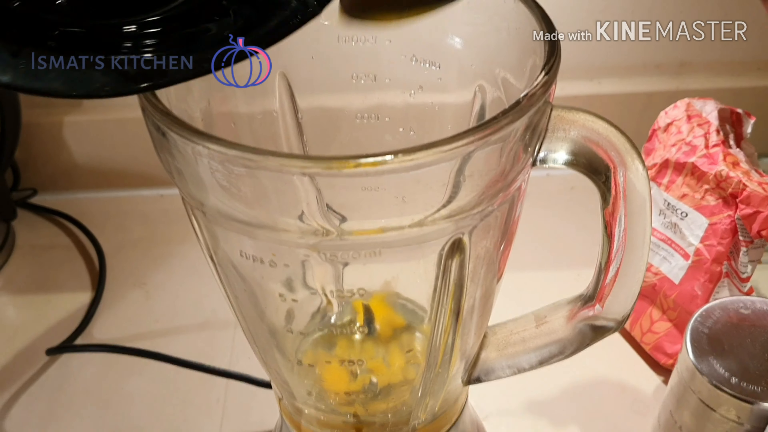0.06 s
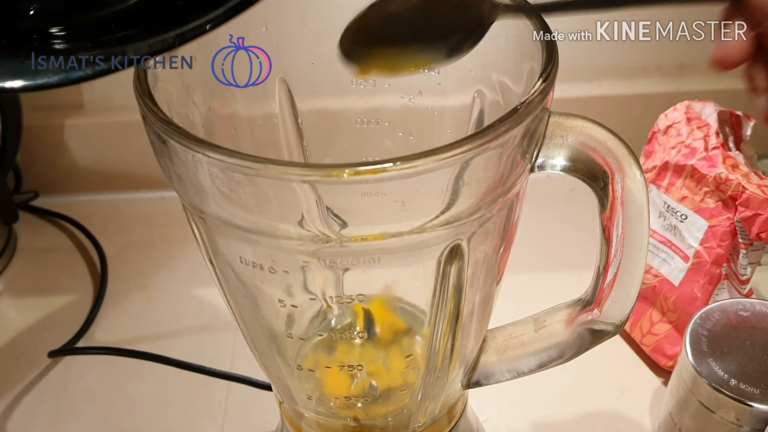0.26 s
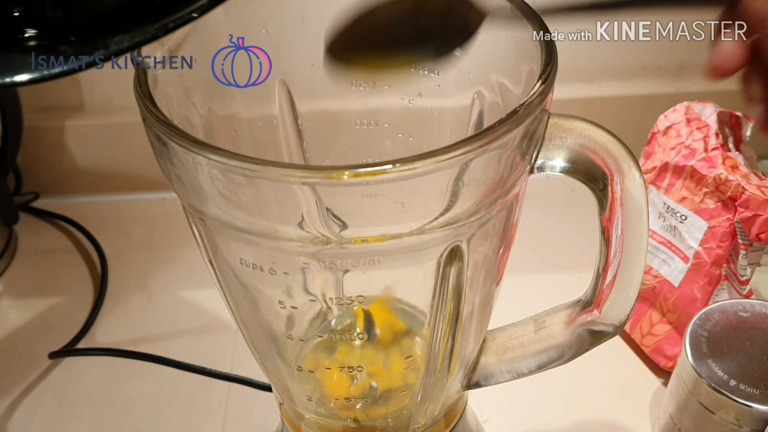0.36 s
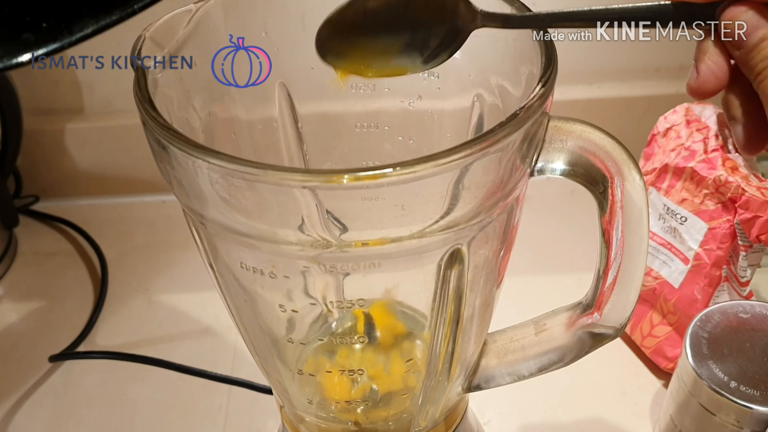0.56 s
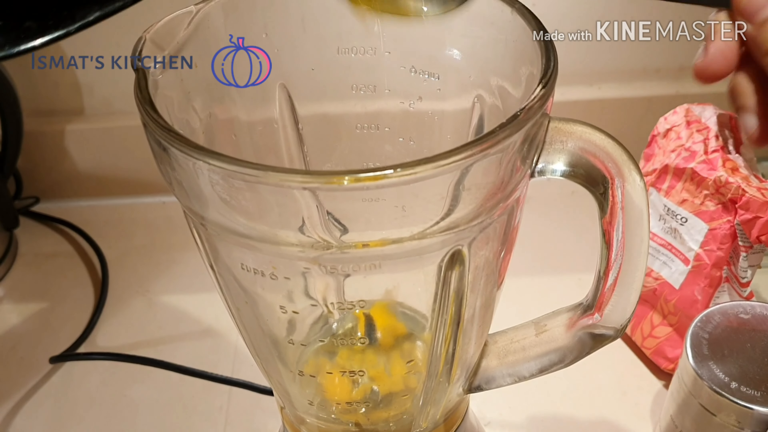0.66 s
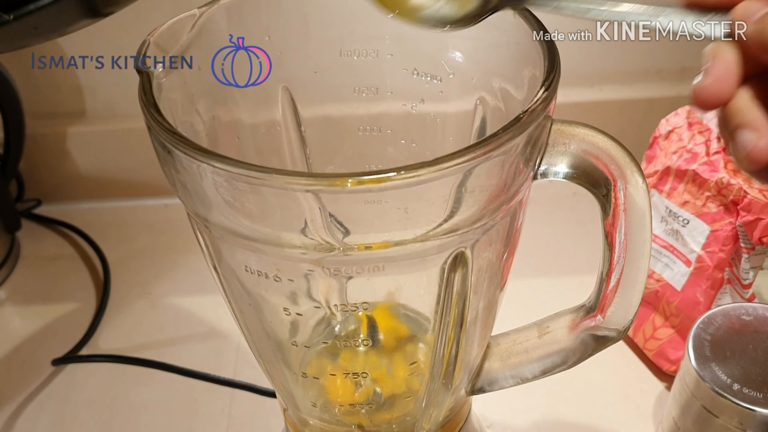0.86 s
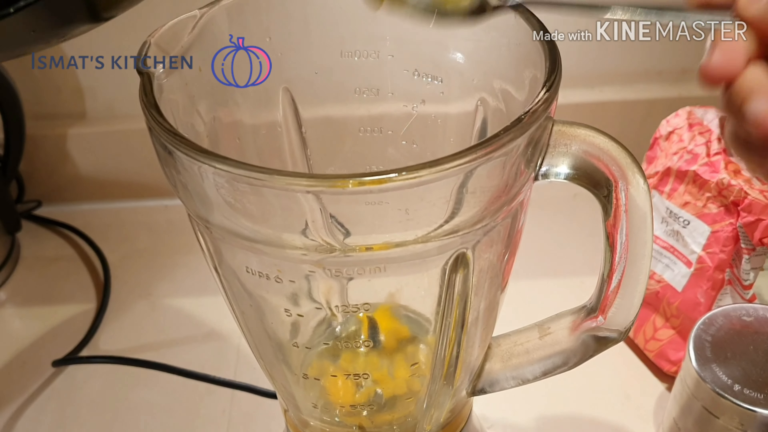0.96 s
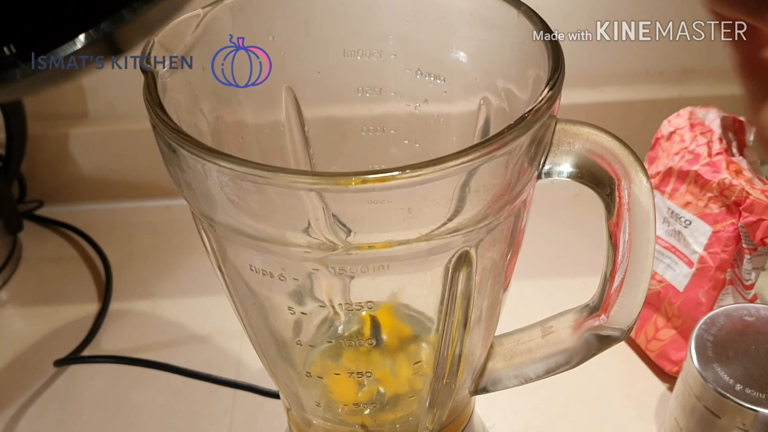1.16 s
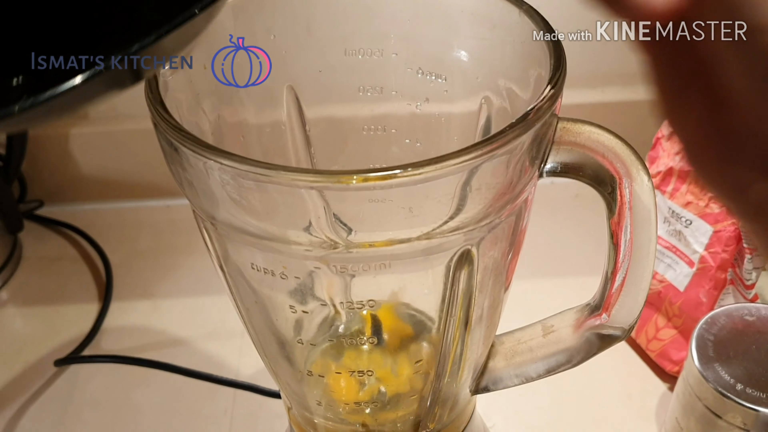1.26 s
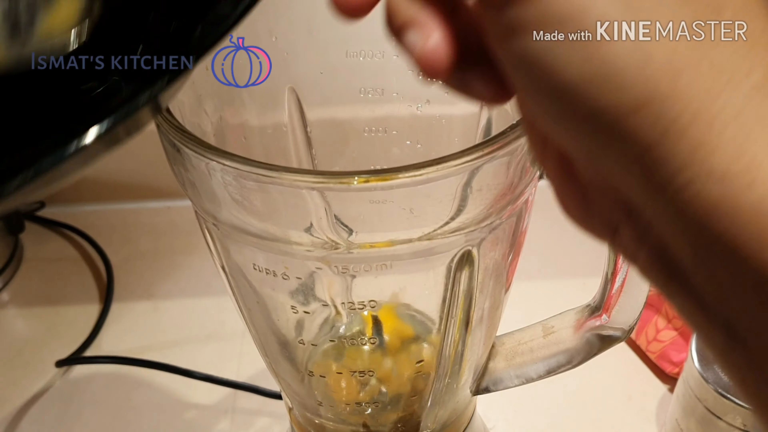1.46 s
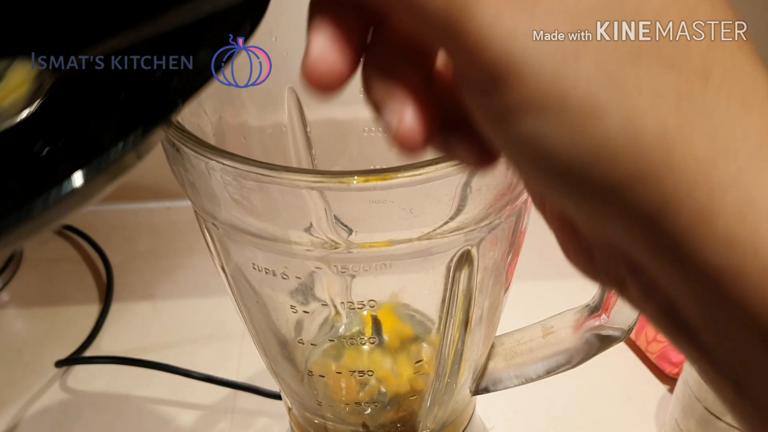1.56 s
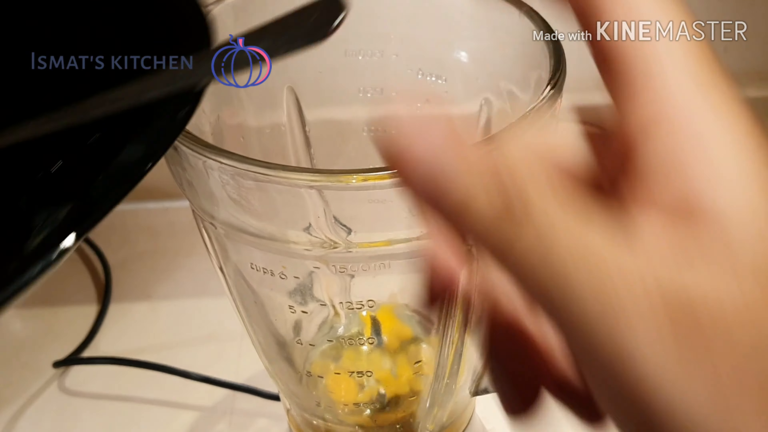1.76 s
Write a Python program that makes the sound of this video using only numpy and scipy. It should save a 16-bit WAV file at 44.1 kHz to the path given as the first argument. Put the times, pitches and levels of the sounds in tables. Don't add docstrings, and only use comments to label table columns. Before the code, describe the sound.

A metal spoon raps a glass blender jar rim four times, sharp and ringing, in a kitchen

```python
import sys
import numpy as np
from scipy import signal
from scipy.fft import rfft, irfft
from scipy.io import wavfile
from scipy.ndimage import uniform_filter1d

SR = 44100
rng = np.random.default_rng(int(sys.argv[2]) if len(sys.argv) > 2 else 0)


def to_wav(s):
    ch = np.atleast_2d(s).T
    pcm = np.round(np.clip(ch, -1, 1) * 32767)
    wavfile.write(sys.argv[1], SR, pcm.astype(np.int16))


def makeup_ratio(level_db):
    decades = np.asarray(level_db, float) / 20
    return 10 ** decades


N = 79380

# [t/s, crack level/dB, small modes level/dB, tilt/dB per octave]
RIM_RAPS = [
    (0.2336, -8.5, -22.5, -1),
    (.4372, -4, -31, 0.76),
    (0.5924, -7, -25.5, -0.45),
    (.7692, -14.5, -21.5, -1.93),
]
# [t/s, thud/dB, jar modes/dB, rattle/dB, tilt/dB per octave]
JAR_DROPS = [
    (0.267, -33, -46.5, -58, .1),
    (0.472, -36.5, -62, -52.5, 0),
    (0.624, -33, -55.5, -59.5, 3),
    (0.807, -34, -36, -28, 0.5),
    (0.922, -64, -44, -35.5, -3),
    (.940, -45, -70, -45, -7),
]
# [f/Hz, level/dB]
RIM_COLOUR = [(88, -48), (150, 0.5), (463, -42.5), (2540, -9.5), (2860, -3.5), (5080, -7.5), (6980, -6),
              (13700, -5), (17000, -88)]


def evened(x):
    return x / np.sqrt(np.mean(x ** 2) + 1e-20)


def read(points, hz):
    f, value = np.transpose(points)
    return np.interp(np.log(hz + 1), np.log(f + 1), value)


def tilt(hz):
    return np.log2(np.clip(hz, 500, 16000) / 4000)


def add(mix, s, sound):
    at = round(s * SR)
    sound = sound[..., max(-at, 0):]
    part = mix[:, max(at, 0):][:, :sound.shape[-1]]
    part += sound[..., :part.shape[1]]


def air():
    # [f/Hz, level/dB]
    air_colour = [(15, -42.5), (25, -13.5), (291, -17), (353, -17.5), (404, -15.5), (1050, -20),
                  (1420, -29.5), (10400, -40.5), (17000, -41)]
    # [f/Hz, likeness 0..1]
    port_likeness = [(60, 0.81), (950, 1), (15000, 0.93)]
    # [f/Hz, level/dB]
    fridge_hum = [
        (50, -72.5),
        (100, -76),
        (355.3, -66.5),
        (947.5, -77),
    ]
    air_db = -56 - 5.5
    frames, hz = N // 256 + 5, np.fft.rfftfreq(1024, 1 / SR)
    a, b, c, d, patches = rng.standard_normal((frames, 513, 5)).T
    patches = uniform_filter1d(patches, size=10, axis=0)
    patches = evened(uniform_filter1d(patches, size=10, axis=1))
    same = np.clip(read(port_likeness, hz), -1, 1)[:, None]
    left = a + 1j * b
    right = same * left + np.sqrt(1 - same ** 2) * (c + 1j * d)
    z = np.array([left, right]) * makeup_ratio(read(air_colour, hz)[:, None] + 1.5 * patches)
    noise = makeup_ratio(air_db) * evened(signal.istft(z, nperseg=1024, noverlap=768)[1][:, :N])

    t = np.arange(N) / SR
    waver = uniform_filter1d(rng.standard_normal((len(fridge_hum), N)), size=3000)
    waver = evened(uniform_filter1d(waver, size=3000))
    hum = 0
    for (f, db), w in zip(fridge_hum, waver):
        hum = hum + makeup_ratio(db + 8.5 + 1.5 * w) * np.sin(2 * np.pi * f * t + 0.22 * w)
    return noise + hum


def kitchen(x):
    # [f/Hz, t60/s]
    room_decay = [(200, 0.52), (1000, 0.39), (4000, 0.35), (12000, 0.25)]
    taps = np.zeros((3, SR // 2))
    at = np.arange(120, SR // 2 - 20, 20)
    at = at + rng.integers(0, 20, (3, len(at)))
    np.put_along_axis(taps, at, rng.choice([-1., 1.], at.shape), 1)
    hz, t, z = signal.stft(taps[:2] + 0.64 * taps[2], SR, nperseg=256)
    decay = makeup_ratio(-60 * t / read(room_decay, hz)[:, None])
    tail = signal.istft(z * decay, SR, nperseg=256)[1]
    return signal.fftconvolve(x, tail / np.linalg.norm(tail[0]), axes=1)[:, :N]


def ticks():
    # [t/s, tick level/dB, pat level/dB]
    wet_ticks = [
        (.1155, -48, -37),
        (1.331, -66, -80),
        (1.4025, -57, -75),
    ]
    tick_hz, tick_s, pat_hz, pat_t60 = 5130, .0015, 263, 0.027
    out, t = np.zeros((2, N)), np.arange(2048) / SR
    high = signal.butter(2, tick_hz, "high", fs=SR, output="sos")
    for s, tick_db, pat_db in wet_ticks:
        hiss = signal.sosfilt(high, rng.standard_normal(2048))
        pat = makeup_ratio(pat_db - 60 * t / pat_t60) * np.sin(2 * np.pi * pat_hz * t)
        swell = t / tick_s * np.exp(1 - t / tick_s)
        add(out, s, makeup_ratio(tick_db) * hiss * swell + pat)
    return out


def ring(modes, db, seconds=.8, s=None, quick_db=-5):
    rise_s, quick_t60 = 0.0018, 0.12
    hz, t60, lead, pan_db, *twin = np.transpose(modes)
    t = np.arange(round(seconds * SR)) / SR
    tones = np.exp(np.outer(2j * np.pi * hz - np.log(1000) / t60, t).astype(np.complex64))
    if twin:
        split_hz, share, phase = np.array(twin)[:, :, None]
        beat = np.exp(1j * (2 * np.pi * split_hz * t + phase)).astype(np.complex64)
        tones = tones * (1 + share * beat)
    turns = rng.random(len(hz)) if s is None else hz * round(s * SR) / SR
    start = makeup_ratio(db) * np.exp(2j * np.pi * turns) / np.sqrt(np.cosh(pan_db * np.log(10) / 20))
    ports = np.array([start * makeup_ratio(side * pan_db / 2) * np.exp(.5j * side * lead) for side in (1, -1)])
    first_loss = 1 + makeup_ratio(quick_db - 60 * t / quick_t60)
    return (ports @ tones).imag * first_loss * (1 - np.exp(-t / rise_s))


def cluster(modes, db, count=6):
    hz, t60, lead, pan_db, width = np.repeat(modes, count, axis=0).T
    place = np.tile(np.arange(count), len(modes))
    u = rng.random((len(hz), 3))
    bunch_hz = hz + width * ((place + u[:, 0]) / count - .5)
    bunch = [bunch_hz, t60, lead + u[:, 1] - .5, pan_db + 3.8 * (u[:, 2] - .5)]
    return ring(np.transpose(bunch), np.repeat(db, count) - 10 * np.log10(count), seconds=.35)


def crack(tone, db, t60, tilt_db):
    t, hz = np.arange(2048) / SR, np.fft.rfftfreq(2048, 1 / SR)
    noise = rng.standard_normal((3, 2048))
    spectrum = rfft(noise[:2] + noise[2])
    noise = evened(irfft(spectrum * makeup_ratio(read(tone, hz) + tilt_db * tilt(hz)), 2048))
    return noise * makeup_ratio(db - 60 * t / t60) * (1 - np.exp(-t / 0.0016))


def small_modes(tone, count=210):
    # [f/Hz, t60/s]
    small_decay = [(400, 0.2), (4000, 0.17), (15000, 0.27)]
    u = rng.random((count, 4))
    hz = 300 + 16000 * ((np.arange(count) + u[:, 0]) / count) ** 1.2
    t60 = read(small_decay, hz) * (.5 + u[:, 1])
    modes = np.array([hz, t60, 3 * (u[:, 2] - .5), 12 * (u[:, 3] - .5)]).T
    db = read(tone, hz)
    return modes, db - 10 * np.log10(np.sum(makeup_ratio(2 * db)))


def strikes(events, tone, metal, metal_spots):
    out = np.zeros((2, N))
    small, small_shape = small_modes(tone)
    for spot, (s, crack_db, small_db, tilt_db) in enumerate(events):
        add(out, s, cluster(metal, np.transpose(metal_spots)[spot]))
        chance_db = 0.53 * rng.standard_normal(len(small))
        level = small_shape + small_db + tilt_db * tilt(small[:, 0]) + chance_db
        add(out, s, ring(small, level, seconds=1 / 6))
        add(out, s, crack(tone, crack_db, 0.011, tilt_db))
    return out


def bowl():
    # [f/Hz, t60/s, left lead/rad, left-right level/dB]
    bowl_modes = [(470, 0.49, 0.1, 2), (1805, 0.26, -1.3, -4), (2283, 0.22, 0.5, -8), (3140, 0.26, 1.9, 5),
                  (4190, 0.2, 1.0, 4), (4900, 0.23, -0.5, 6), (5200, 0.27, 1.3, 7), (6970, 0.25, 1.0, 8),
                  (7453, 0.24, 0.4, 8), (9065, 0.19, -0.8, -1), (10040, 0.19, -0.3, 7),
                  (10560, 0.21, 0.6, 2), (12200, 0.22, 0.7, 0), (13630, 0.21, -1.2, 7)]
    bowl_spots = [(-38.5, -75, -59.5), (-30, -47.5, -51.5), (-28.5, -67, -51), (-24, -33.5, -44),
                  (-21.5, -39.5, -45.5), (-67, -41.5, -51), (-42.5, -39, -48), (-26, -40, -48.5),
                  (-53.5, -40, -72.5), (-27, -34, -55.5), (-40.5, -46, -62), (-31, -39, -64.5),
                  (-34.5, -68, -59), (-33, -66, -60)]
    # [f/Hz, level/dB]
    bowl_colour = [(180, -43), (300, -20), (1240, -13.5), (2240, -1), (8800, -8.5), (15400, -9.5),
                   (17000, -79)]
    # [t/s, crack level/dB, small modes level/dB, tilt/dB per octave]
    clinks = [
        (1.4825, -22.5, -26.5, 0.9),
        (1.6618, -24.5, -39, -1.5),
        (-.004, -60, -45.5, -3),
    ]
    # [t/s, level/dB, tilt/dB per octave]
    bounces = [
        (1.676, -29, 2.5),
        (1.547, -37, -2),
    ]
    hand_damping, spread_hz = 0.45, 83
    modes = [(hz, hand_damping * t60, lead, pan_db, spread_hz) for hz, t60, lead, pan_db in bowl_modes]
    out = strikes(clinks, bowl_colour, modes, bowl_spots)
    add(out, 1.662, cluster([(3150, 0.096, 0.87, 3.4, 660)], [-34], count=10))
    for s, db, tilt_db in bounces:
        add(out, s, crack(bowl_colour, db, 0.069, tilt_db))
    return out


def drops():
    # [f/Hz, t60/s, left lead/rad, left-right level/dB, spread/Hz]
    egg_slide = [(1494, 0.83, 0.012, 0, 300)]
    thud_hz, thud_t60, thud_sag = 53.4, 0.27, 0.73
    glass, thuds, t = np.zeros((2, N)), np.zeros((2, N)), np.arange(SR // 2) / SR
    turn = 2 * np.pi * np.cumsum(thud_hz * (1 + thud_sag * np.exp(-t / 0.0085))) / SR
    for s, thud_db, _, rattle_db, tilt_db in JAR_DROPS:
        add(thuds, s, makeup_ratio(thud_db - 60 * t / thud_t60) * np.sin(turn) * (1 - np.exp(-t / 0.002)))
        add(glass, s, crack(RIM_COLOUR, rattle_db, 0.052, tilt_db))
    add(glass, .93, cluster(egg_slide, [-52.5], count=12))
    add(glass, 1.485, cluster([(2113, 0.17, .3, -5.5, 600)], [-31], count=10))
    return glass, thuds * makeup_ratio([[.9], [-.9]])


def spoon_raps():
    # [f/Hz, t60/s, left lead/rad, left-right level/dB, spread/Hz]
    spoon_modes = [(394, 0.27, -0.5, -2.5, 73), (3430, .2, 4.5, 14.5, 18), (3804, 0.1, 3, -3.5, 490),
                   (4720, 0.26, 2, 4, 61), (5660, .2, 2.1, -2, 180), (6260, 0.054, -1, -7, 230),
                   (9230, 0.096, 1.5, 8.5, 66), (9480, 0.1, 0.5, 6, 250), (11570, 0.05, -5, -9, 670),
                   (13360, 0.13, 5.5, 2.5, 300), (15000, .15, 0, -6, 700), (16700, .02, 1.5, -3, 1200)]
    spoon_spots = [(-34, -33, -33.5, -34), (-33, -27, -35.5, -50.5), (-11.5, -15, -14.5, -24),
                   (-37, -34, -33, -44.5), (-38, -31, -29.5, -37.5), (-18, -29, -28.5, -16),
                   (-39.5, -29.5, -32, -22), (-25, -24, -21.5, -24.5), (-37.5, -28, -26, -19),
                   (-28.5, -27, -28, -23), (-37, -63, -63.5, -27.5), (-35.5, -31.5, -31, -27)]
    return strikes(RIM_RAPS, RIM_COLOUR, spoon_modes, spoon_spots)


def jar_ring(db, s):
    jar_hz = [455, 930, 1033, 2227, 2381, 6850, 2903, 3995, 4472, 5570, 7636, 9453, 9805, 12110]
    # [t60/s, left lead/rad, left-right level/dB, twin split/Hz, twin share, twin
    jar_table = [(.12, 0, -4, 21, 0.6, 0.21), (1.3, -1, 10, 3, .1, -2.2), (0.81, 1.7, -7, 4, 0.14, 0),
                 (.36, -1.9, -6, 9, .35, -1.5), (.46, .1, -2.1, 3.5, .25, -1.6),
                 (.23, .2, 9, 10, .6, -3.5), (0.31, 0.64, -3, 14, .25, -1.9),
                 (0.26, -1.5, 7, 7.6, .25, -1), (.13, -0.05, -2, 16, .3, -2.1),
                 (.12, 1.37, -2, 20, .3, -0.7), (.18, -2.5, 4, 15, 0.27, -0.1),
                 (.11, -0.67, 1.5, 18, 0.37, 0.48), (.24, -0.96, -2.1, 11, .3, -0.3),
                 (.2, -1.8, -2.5, 17, .3, .1)]
    return ring(np.column_stack([jar_hz, jar_table]), db, seconds=0.49, s=s, quick_db=-13)


def jar_modes():
    # [level/dB at each of four raps, level/dB at the base]
    jar_spots = [(-31, -31.5, -31, -27, -7), (-62, -57, -57.5, -71, -18), (-43.5, -54, -47.5, -58, -6),
                 (-36, -43, -44, -41, -20), (-45, -45, -45, -28, -8), (-19, -23, -23.5, -21, 0),
                 (-22, -26.5, -30.5, -24.5, -24), (-13.5, -29, -35.5, -24, -15),
                 (-21.5, -42, -41, -18, -22.5), (-37.5, -24, -27, -31, -8),
                 (-24.5, -27, -29.5, -34.5, -21), (-16.5, -14, -14, -16, -15),
                 (-26.5, -33, -27, -33, -23), (-29, -35, -28, -30, -20.5)]
    out, spots = np.zeros((2, N)), np.transpose(jar_spots)
    for rap, db in zip(RIM_RAPS, spots):
        add(out, rap[0], jar_ring(db, rap[0]))
    for s, _, glass_db, *_ in JAR_DROPS:
        add(out, s, jar_ring(glass_db + spots[-1], s))
    return out


def scene():
    glass, thuds = drops()
    jar = glass + spoon_raps()
    dish = bowl()
    modes = jar_modes()
    echo = makeup_ratio(-4) * kitchen(jar + makeup_ratio(-3.5) * modes + makeup_ratio(-1.5) * dish)
    return jar + modes + dish + echo + thuds + ticks() + air()


def top_band(x):
    top_hz, jump_db, hold_s = 15650, 12, .007
    low_pass = signal.firwin(511, top_hz, window=("kaiser", 9), fs=SR)[None]
    low = signal.oaconvolve(x, low_pass, "same")
    power_db = 10 * np.log10(abs(uniform_filter1d((x ** 2).mean(0), size=128)) + 1e-12)
    jump = power_db - np.roll(power_db, 176) > jump_db
    held = uniform_filter1d(1. * jump, size=round(hold_s * SR)) > 1e-6
    return low + (x - low) * uniform_filter1d(1. * held, size=64)


def top_cut(x):
    return signal.sosfilt(signal.butter(12, 17160, fs=SR, output="sos"), x)


def record(dry):
    ports_hz, rumble_hz, edge_hz, limit = 498.4, 40.3, 17100, 1.1
    mid, side = (dry[0] + dry[1]) / 2, (dry[0] - dry[1]) / 2
    side = signal.sosfilt(signal.butter(1, ports_hz, "high", fs=SR, output="sos"), side) + side / 5
    rumble = signal.butter(2, rumble_hz, "high", fs=SR, output="sos")
    ports = signal.sosfilt(rumble, [mid + side, mid - side])
    ports = top_band(limit * np.tanh(ports / limit))
    edge = signal.firwin(511, edge_hz, window=("kaiser", 9), fs=SR)[None]
    return top_cut(signal.oaconvolve(ports, edge, "same"))


dry = scene()
out = record(dry)
to_wav(out)
```